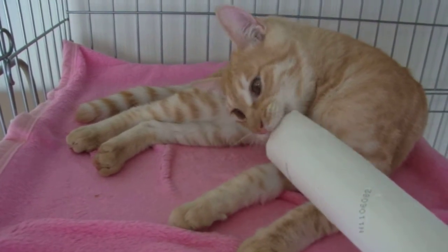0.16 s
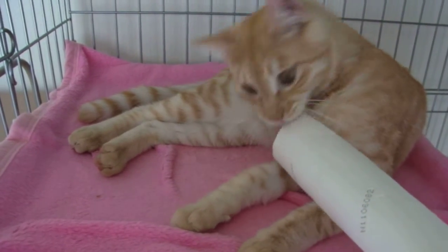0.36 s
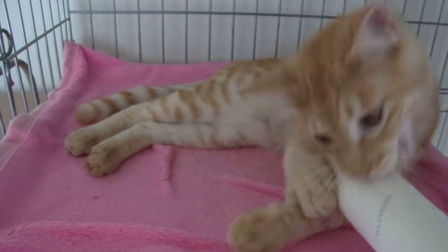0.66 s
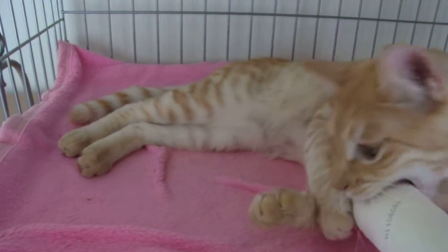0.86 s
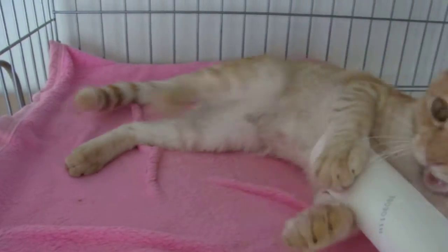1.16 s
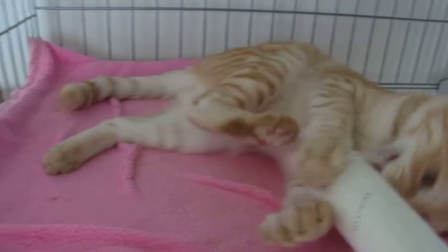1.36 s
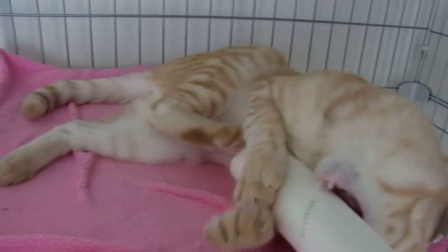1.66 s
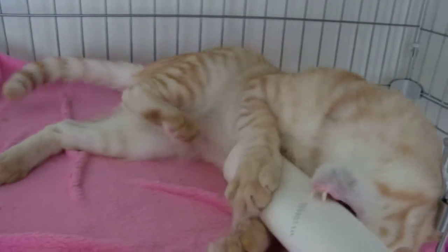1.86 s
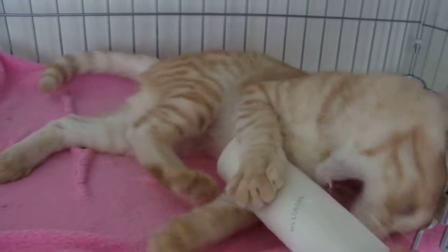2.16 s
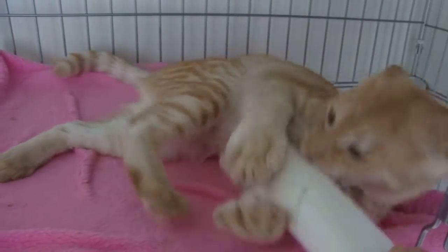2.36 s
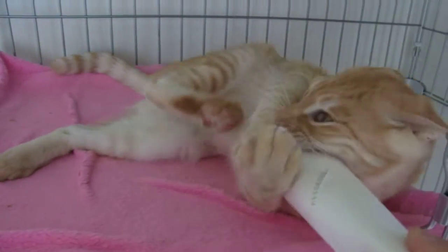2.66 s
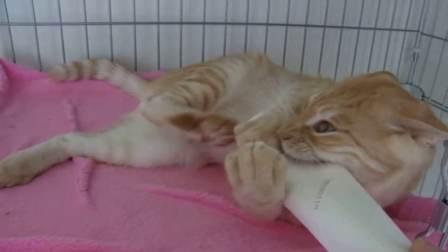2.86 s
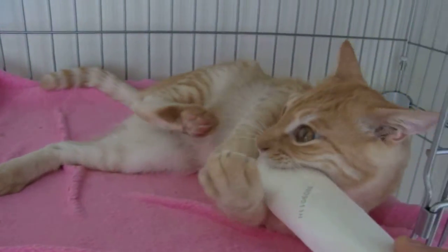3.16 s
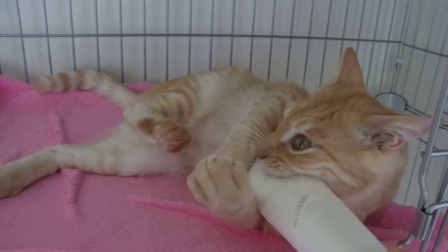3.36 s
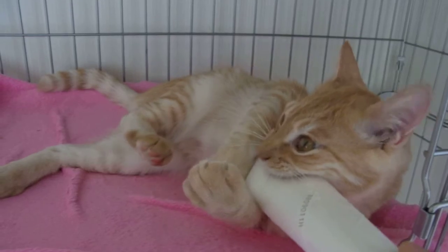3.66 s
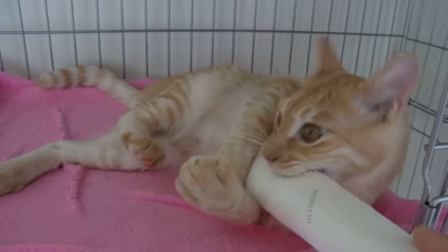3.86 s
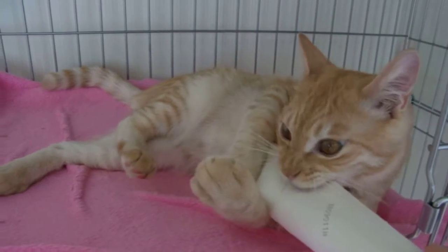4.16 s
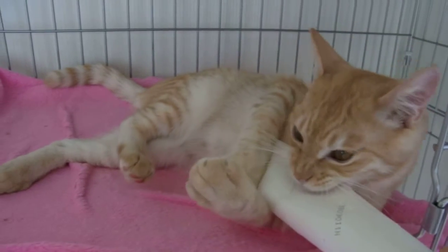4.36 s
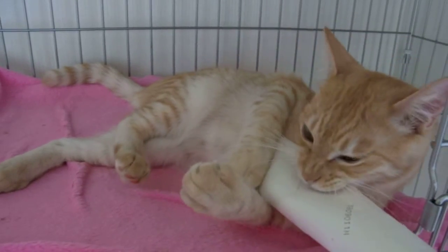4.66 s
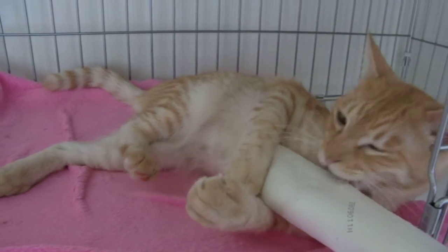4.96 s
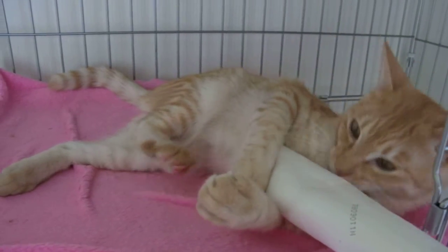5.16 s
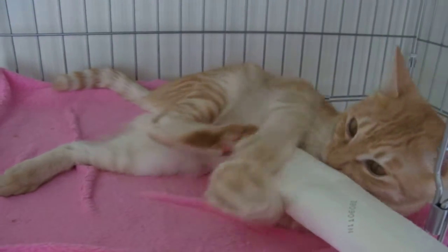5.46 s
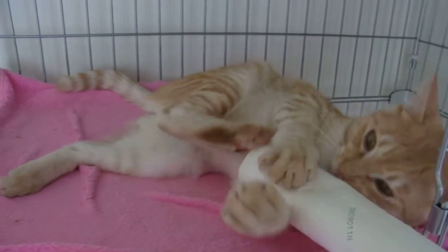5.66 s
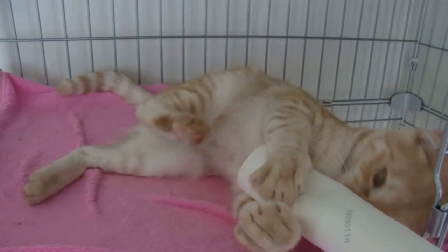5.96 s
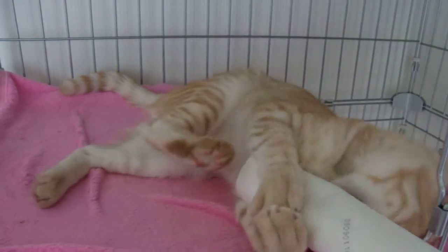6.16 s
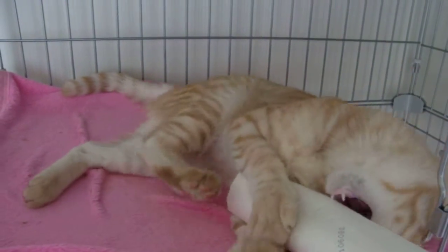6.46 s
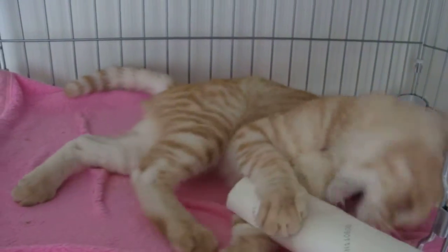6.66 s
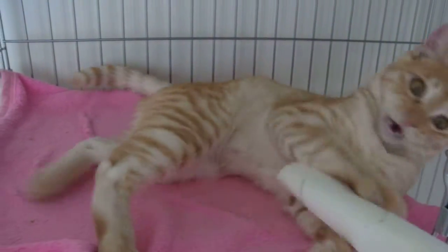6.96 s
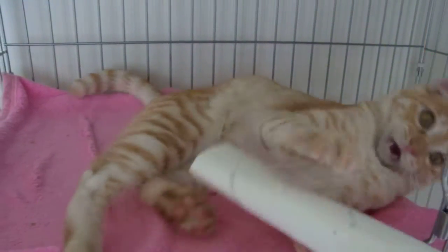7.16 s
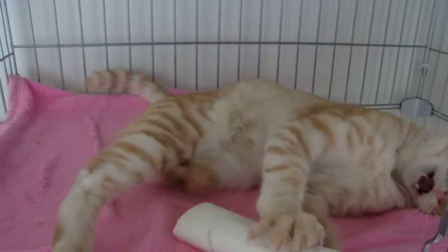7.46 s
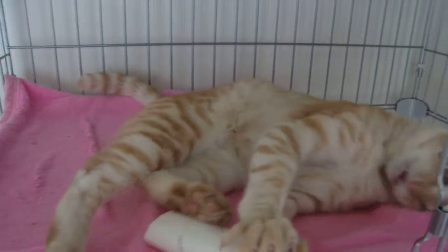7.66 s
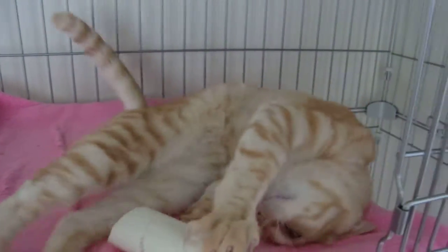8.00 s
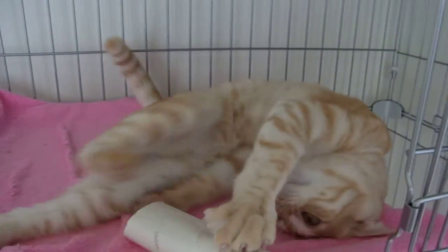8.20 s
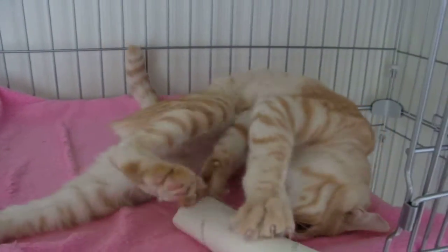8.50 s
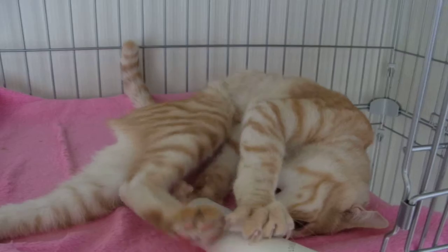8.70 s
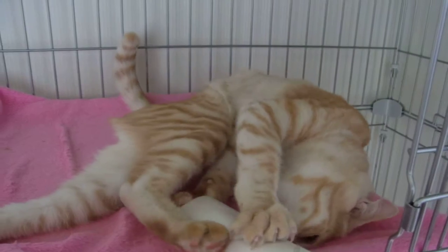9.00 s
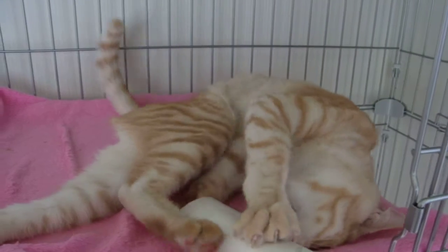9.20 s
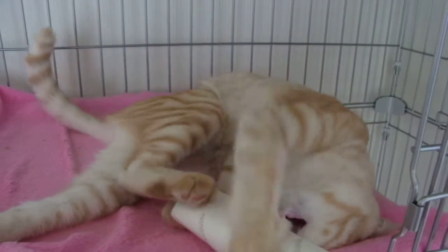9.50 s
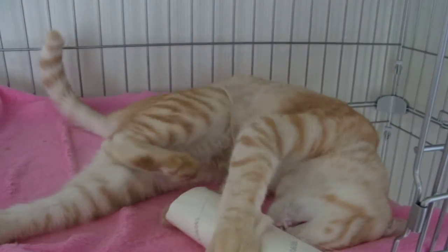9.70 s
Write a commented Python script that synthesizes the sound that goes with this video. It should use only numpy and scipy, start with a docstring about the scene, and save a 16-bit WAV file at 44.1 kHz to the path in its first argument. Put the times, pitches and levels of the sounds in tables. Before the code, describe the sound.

Claws scratch and knock a hollow cardboard tube, teeth creak and crackle on its rim, and soft thuds land on a blanket.

```python
"""In a cage in a small quiet room, a kitten wrestles a cardboard tube on a blanket, heard close by.
Fur and paws rub the tube and claws scrape it: friction noise drives its resonances.
Claws and teeth knock it and teeth creak through the rim in stick-slip jerks: pulses make it ring.
Damped modes colour these contacts; bumps thud, and low noise rumbles as the camera is handled.
Shaped noise gives the room air, and steady sines a mains hum and a thin electronic whine."""
import sys
import numpy as np
from scipy import signal
from scipy.fft import rfft, irfft
from scipy.io import wavfile
from scipy.ndimage import uniform_filter1d

SR = 44100
rng = np.random.default_rng(int(sys.argv[2]) if len(sys.argv) > 2 else 0)


def bounce(signal):
    """Save signal as a 16-bit WAV file at the path given by the first command-line argument."""
    frames = np.transpose(np.atleast_2d(signal))
    limited = np.clip(frames, -1, 1)
    pcm = np.round(limited * 32767).astype(np.int16)
    wavfile.write(sys.argv[1], SR, pcm)


N = 433944
TIME = np.arange(N) / SR
RING = 4096  # samples that a blow rings for
ATTACK = 220  # samples over which a blow's level is set
AGE = TIME[:RING]
TOP_HZ = 15800

# In the contact tables hollow_db and hiss_db are relative to the wall's level_db.
# Where marked "before trim", a small gain in the source or the mix follows.

# room air spectrum, of which only the shape counts: pitch_hz, density_db (per Hz)
AIR_SPECTRUM = [(25, -8), (70, -10.5), (350, -7.5), (900, -13.5), (5900, -21), (16000, -20.5)]
AIR_DB = -55.5
# mains hum and a thin electronic whine: pitch_hz, level_db (rms)
HUM_TONES = [(100.1, -61), (15519, -92)]

# damped resonances of each part: pitch_hz, width_hz, level_db (relative, before filtering)
# air inside the tube
HOLLOW_MODES = [(221, 17, -3.5), (388, 120, -1), (663.6, 49, 5.5), (686, 300, 0.5), (858, 14, 5)]
# cardboard wall
WALL_MODES = [(1275, 310, -5.5), (1463, 160, 5.5), (1690, 120, -1), (1865, 260, 4.5), (2450, 310, -0.5),
              (2750, 1200, -4), (3080, 550, 1), (3960, 460, -4.5), (4550, 740, -6)]
# sharp contact of claw and paper fibres
FIBRE_MODES = [(7400, 2900, -10.5), (11340, 4300, 10), (13650, 2100, -16)]
# rim clamped in the jaw
RIM_MODES = [(850, 180, 4.5), (1394, 140, 8), (2700, 1700, -10), (5140, 1800, -12.5), (10400, 1600, -12),
             (12800, 1500, -2.5)]

# strokes of fur and paws, before trim: firmest_s, swell_s, fade_s, level_db, hollow_db, hiss_db
RUB_STROKES = [(.65, 0.091, 0.055, -56.5, -8, 4.5), (.725, 0.012, 0.047, -50.5, 5.5, 1.5),
               (.81, 0.043, 0.058, -53.5, 6, 5), (.94, 0.019, 0.017, -54.5, 7, 1),
               (1.095, 0.056, 0.04, -45, 4.5, 2), (1.405, 0.012, 0.017, -50.5, -15, 9.5),
               (1.51, 0.085, 0.073, -51.5, -13, 7.5), (1.63, 0.018, 0.074, -49.5, 0.5, 0.5),
               (1.785, 0.077, 0.027, -46.5, -22, -0.5), (2.16, 0.35, 0.08, -57.5, 1.5, 1.5),
               (2.33, 0.094, 0.042, -56.5, -5, 3.5), (2.42, 0.038, 0.076, -52.5, -6, 7),
               (2.51, 0.041, 0.09, -54, 3.5, -8), (2.92, .015, 0.078, -51.5, -22, -3),
               (3.19, 0.022, 0.04, -55, 3.5, -8), (3.9, 0.061, 0.045, -51.5, 6.5, -6),
               (4.36, 0.3, 0.11, -60.5, 0, -21), (4.58, 0.055, 0.078, -56, -14, 3.5),
               (5.5, 0.022, 0.03, -54, -18, 2), (5.58, 0.014, 0.041, -54.5, -2, -1),
               (5.765, 0.047, 0.012, -50.5, -8.5, -0.5), (6.02, 0.2, 0.32, -54, -14, -3.5),
               (6.22, 0.082, 0.14, -60.5, 4.5, 4.5), (6.595, 0.13, 0.049, -57, 6, -1),
               (6.661, 0.043, 0.017, -48.5, 4, 1.5), (6.88, 0.065, 0.034, -53.5, -3.5, 2.5),
               (7.058, 0.077, 0.045, -43, -5.5, 3), (7.135, 0.035, 0.02, -37, -18, -10),
               (7.275, 0.063, 0.06, -43, -6.5, -2), (7.432, 0.022, 0.019, -39.5, -4, 1.5),
               (7.71, 0.26, 0.036, -57, -19, -5), (7.82, 0.14, 0.04, -51.5, -11, 8.5),
               (7.95, 0.083, 0.046, -52, -3, -3.5), (8.2, 0.15, 0.052, -54.5, -2, -8),
               (8.36, 0.059, 0.018, -55, 7, 3), (8.461, 0.042, 0.034, -42.5, 0, -1.5),
               (8.81, 0.11, 0.094, -57.5, -7, 4), (9.07, 0.051, .03, -55.5, -19, 2.5),
               (9.295, 0.036, 0.044, -43.5, -5.5, 0), (9.36, 0.021, 0.018, -48, 1, 1.5),
               (9.52, 0.011, 0.035, -47.5, 5.5, -7), (9.615, 0.045, 0.048, -46.5, 0, 2),
               (9.84, 0.016, .02, -50.5, -2, 0)]
PRESS_SHAPE = 1.16  # exponent of swell and fade: 1 is pointed, 2 a rounded bell
# light, unbroken touch of fur between strokes, before trim: wall_db, hollow_db, hiss_db (all absolute)
FUR_TOUCH = (-70, -73.5, -65)
# short claw strokes, before trim: start_s, length_s, level_db, hollow_db, hiss_db, spot_hz (touched spot)
CLAW_SCRAPES = [(0.12, 0.044, -50, -5.5, 1.5, 1550), (0.761, 0.049, -47.5, 6, -2, 3230),
                (1.09, 0.022, -37.5, -12, -13, 1335), (2.131, 0.034, -43.5, 0, -5, 1410),
                (2.474, 0.083, -49.5, -5, -21, 1320), (2.495, 0.016, -61, -14, -14, 2660),
                (2.902, 0.012, -36, -27, -11, 1790), (3.851, 0.034, -42, -3, -6.5, 1640),
                (4.433, 0.0082, -47.5, -24, -4, 1340), (7.078, 0.031, -40, -9, 0, 3360),
                (7.121, 0.027, -38.5, -15, -6.5, 880), (7.49, 0.018, -44, -15, 1.5, 3020),
                (7.922, 0.011, -49.5, -26, 4.5, 1750), (8.043, 0.019, -39.5, -19, -5.5, 1910),
                (8.155, 0.02, -37.5, -31, -9.5, 1780), (8.199, 0.0123, -39, -19, 3, 1730),
                (8.344, 0.025, -45, -14, -15, 3200), (8.72, 0.0073, -47.5, -17, 3.5, 1560),
                (8.77, 0.01, -44, -15, -2, 3100), (8.809, 0.018, -47, -20, -1, 3180),
                (8.848, 0.012, -50, -26, 3, 1890.0), (8.89, 0.012, -49.5, -8, -4, 1500),
                (9.187, 0.016, -44.5, -13, -3.5, 2000)]
# claws and teeth striking or snapping off the tube, before trim:
# start_s, level_db, hollow_db, hiss_db, spot_hz (touched spot)
TUBE_KNOCKS = [(0.124, -43, -17, 3, 1520), (0.3422, -47.5, -16, -13, 1860), (0.7105, -43.5, -2, -12, 1270),
               (1.435, -39.5, -7.5, -10, 1420), (1.5975, -41, -4, -3, 1450), (1.79, -39.5, -11, 2.5, 4080),
               (1.8019, -44, 10, -2, 1370), (2.4644, -36, -3, -10, 1270), (2.5966, -44.5, 7, -13, 1370),
               (2.6104, -46, 3, -3.5, 1330), (2.8, -47.5, -2.5, -7, 1513), (2.905, -32, -6.5, 2, 3150),
               (2.9677, -41.5, -12, -5, 3080), (3.1355, -42, -20, -6, 1460),
               (3.1665, -34.5, -6.5, 8.5, 4460), (3.1692, -31, -29, -13, 4240),
               (3.1752, -33.5, -13.5, 3.5, 955), (3.7551, -31.5, -16, 0.5, 1420),
               (3.766, -37, -7.5, -1, 1500), (3.861, -37.5, 3, -8, 1410), (3.8986, -34, -2.5, -5.5, 1320),
               (4.4919, -37.5, -16, -2.5, 1430), (4.5165, -45, -11, -5, 1700), (4.534, -42, -9, -4, 1380),
               (4.548, -44, -15, -9, 1900), (4.5882, -50.5, -5, 0, 1220), (4.7426, -32, -3.5, -8, 1360),
               (4.9272, -41.5, 2, -15, 1360), (4.9838, -43, 0, -16, 1570), (5.666, -45, -8, -14.2, 1740),
               (6.2096, -44.5, -5, -7, 3400), (6.9683, -37, -1, -8, 1460), (7.083, -36.5, -8, -6, 3500),
               (7.118, -33, -23, -11, 1660), (7.244, -26.5, -6.5, -14, 1630), (7.2489, -37, -8, -13, 1470),
               (7.26, -35, -6, -5, 1760), (7.2662, -26, -30, 2, 1730), (7.4406, -30.5, -31, -22, 1130),
               (7.442, -30.5, -26, 5.5, 2000), (7.4917, -44, -2, -9, 3100), (8.3087, -28.5, -10, 5, 3500),
               (8.793, -32, -29, -19, 1920), (9.1768, -36.5, -10.5, -10, 1670), (9.2945, -40, -5, -8, 1800),
               (9.494, -32, -1, -8, 1510), (9.5443, -21, -7, -11, 1620), (9.5482, -30, -3, 0, 3340),
               (9.614, -48, 2, -6, 1210)]
# body and tube bumping the padded floor: start_s, level_db, pitch_hz (thud)
FLOOR_BUMPS = [(.7105, -38.5, 342), (2.6118, -38, 370), (2.71, -51, 170), (2.765, -51, 380),
               (3.861, -39, 304), (9.495, -38, 330), (9.543, -34.5, 410), (9.614, -40, 352),
               (9.68, -47, 284)]
# faint deep rumbles as the camera is handled: peak_s, level_db
HANDLING_RUMBLES = [(1.3, -54.5), (1.76, -59), (2.13, -56), (7.46, -57), (9.48, -54)]
# path of one long claw swipe: time_s, pitch_hz (resonance), level_db
SWIPE_PATH = [(1.44, 3500, -46), (1.475, 3700, -56.5), (1.527, 2400, -43.5), (1.543, 2050, -53),
              (1.584, 2450, -50.5), (1.591, 1950, -33.5), (1.6, 1550, -47)]

# one long bite begins as a creak of quick, tiny slips that grow as the jaw closes (levels before trim)
CREAK_START_S, CREAK_END_S, CREAK_HZ = 3.334, 3.387, 255
CREAK_START_DB, CREAK_END_DB = -51, -38
# then the tooth holds and lets go in separate snaps: start_s
BITE_SNAPS = [3.4004, 3.408, 3.4261, 3.4338, 3.4494, 3.4688, 3.4798, 3.4926, 3.5132, 3.5341, 3.5399, 3.5826]
# a snap is louder the longer the tooth has held and the tighter the jaw has become (before trim)
SNAP_DB, SNAP_HOLD_S, SNAP_DB_PER_DOUBLING, JAW_DB_PER_S = -38.5, 0.016, 1.5, 26.5
# thin ticks of tooth on tooth: start_s, level_db
TEETH_TICKS = [(3.6645, -34)]
# spells of gnawing at the rim: start_s, end_s, rate_hz (ticks), level_db (each tick is set 10 to 18 dB lower)
GNAW_SPELLS = [(4.133, 4.207, 43, -41), (4.279, 4.4, 88, -39.5), (4.447, 4.64, 70, -40)]


def undb(db):
    """Logarithmic level: decibels become an amplitude gain."""
    return 10 ** (np.asarray(db) / 20)


def unit(x, size=None):
    """Normalisation: scale to rms 1, judged over the first size samples."""
    return x / np.sqrt(np.mean(x[:size] ** 2))


def add(out, s, x):
    """Superposition: mix x into out from time s on."""
    i = max(int(s * SR), 0)
    out[i:i + len(x)] += x[:max(len(out) - i, 0)]


def through(x, response):
    """Convolution: pass x through an impulse response."""
    return signal.fftconvolve(x, response)[:len(x)]


def cut(x, hz, kind, order=2):
    """Butterworth filtering: low-pass or high-pass."""
    return signal.sosfilt(signal.butter(order, hz, kind, fs=SR, output="sos"), x)


def ring(modes, low_hz):
    """Modal superposition: unit-energy damped resonances that radiate poorly under low_hz."""
    x = np.zeros(RING)
    for hz, width_hz, db in modes:
        decay = np.exp(-np.pi * width_hz * AGE)
        # scaling by width makes the level that of the resonance peak
        x += undb(db) * width_hz * decay * np.cos(2 * np.pi * hz * AGE)
    x = cut(x, low_hz, "high", order=3)
    x = cut(x, modes[-1][0] * 1.046, "low", order=3)
    return x / np.linalg.norm(x)


def wall_at(wall, spot_hz, spot_db, q):
    """Local modal excitation: at the touched spot one panel resonance of sharpness q stands out."""
    spot = np.exp(-np.pi * spot_hz / q * AGE) * np.cos(2 * np.pi * spot_hz * AGE)
    spot = cut(spot, spot_hz * 2, "low", order=1)
    both = wall + undb(spot_db) * spot / np.linalg.norm(spot)
    return both / np.linalg.norm(both)


def walk(rate):
    """Smoothed random process: a wander with rms 1, given rate new values a second."""
    k = int(SR / rate)
    steps = np.repeat(rng.standard_normal(N // k + 1), k)
    return unit(uniform_filter1d(steps, k)[:N])


def friction(rate, spread_db, jerk_db):
    """Stick-slip friction: fibres let go in rate uneven clicks a second, swayed by a jerky grip."""
    caught = rng.random(N) < rate / SR
    size_db = spread_db * np.minimum(rng.exponential(size=N), 4)
    clicks = caught * undb(size_db) * rng.choice([-1, 1], N)
    return unit(clicks * undb(jerk_db * walk(130)))


def press(late_s, swell_s, fade_s):
    """Pressure envelope: it builds up and eases off around the firmest moment, late_s = 0."""
    side_s = np.where(late_s < 0, swell_s, fade_s)
    return np.exp(-np.abs(late_s / side_s) ** PRESS_SHAPE)


def background(air_db):
    """Stationary noise and tones: spectrally shaped room air under a steady hum and whine."""
    hz, db = np.transpose(AIR_SPECTRUM)
    bins_hz = np.maximum(np.fft.rfftfreq(N, 1 / SR), 1)
    shape = undb(np.interp(np.log(bins_hz), np.log(hz), db))
    air = irfft(rfft(rng.standard_normal(N)) * shape, N)
    hum = sum(undb(db) * np.sqrt(2) * np.sin(2 * np.pi * hz * TIME) for hz, db in HUM_TONES)
    return unit(air) * undb(AIR_DB + air_db) + hum


def rubbing(tube, spot_hz=1700, roam=.25, roam_rate=20, width_hz=170, spot_db=-6, wall_db=-1):
    """Friction-driven resonance: fur and pads drag in strokes, and the panel under them rings as they roam."""
    grains = friction(rate=4500, spread_db=2.0, jerk_db=2.0)
    powers = [np.full(N, undb(db) ** 2) for db in FUR_TOUCH]
    for s, swell_s, fade_s, db, hollow_db, hiss_db in RUB_STROKES:
        start = max(s - 4 * swell_s, 0)
        stroke = press(np.arange(start - s, 4 * fade_s, 1 / SR), swell_s, fade_s)
        for power, part_db in zip(powers, (0, hollow_db, hiss_db)):
            add(power, start, (stroke * undb(db + part_db)) ** 2)
    wall, hollow, fibres = (through(grains * np.sqrt(power), part) for power, part in zip(powers, tube))
    # low-passed grains on a wandering carrier make the roaming resonance
    roaming_hz = spot_hz * np.exp(roam * walk(roam_rate))
    phase = 2 * np.pi * np.cumsum(roaming_hz) / SR
    spot = unit(cut(grains, width_hz, "low") * np.cos(phase)) * np.sqrt(powers[0])
    return undb(wall_db) * wall + undb(spot_db) * spot + hollow + fibres


def scraping(tube, rise_s=0.0043, release_s=0.0066):
    """Friction under a brief load: a claw digs in, rasps along the wall and lifts off."""
    wall, hollow, fibres = tube
    grains = friction(rate=2800, spread_db=2.0, jerk_db=0.5)
    out = np.zeros(N)
    for s, length_s, db, hollow_db, hiss_db, spot_hz in CLAW_SCRAPES:
        count, i = int(length_s * SR), int(s * SR)
        t = TIME[:count + RING]
        dig_in = 1 - np.exp(-t / rise_s)
        lift_off = np.exp(-np.maximum(t - length_s, 0) / release_s)
        stroke = grains[i:i + len(t)] * dig_in * lift_off
        touched = wall_at(wall, spot_hz, spot_db=1.0, q=9.7)
        for part, part_db in ((touched, 0), (hollow, hollow_db), (fibres, hiss_db)):
            add(out, s, unit(through(stroke, part), count) * undb(db + part_db))
    return out


def knocking(tube, crush=0.088, crush_s=0.0051, point_hz=420):
    """Impulsive excitation: a sharp release and a few milliseconds of crushing fibres ring the tube."""
    wall, hollow, fibres = tube
    hollow = cut(hollow, point_hz, "high")  # a point contact hardly stirs the deepest air modes
    out = np.zeros(N)
    for s, db, hollow_db, hiss_db, spot_hz in TUBE_KNOCKS:
        push = crush * rng.standard_normal(RING) * np.exp(-AGE / crush_s)
        push[0] = 1
        touched = wall_at(wall, spot_hz, spot_db=1.0, q=7.2)
        for part, part_db in ((touched, 0), (hollow, hollow_db), (fibres, hiss_db)):
            add(out, s, unit(through(push, part), ATTACK) * undb(db + part_db))
    return out


def disperse(x, lag, order=5):
    """Dispersion: bending waves in cardboard lag at low frequencies, so a click becomes a short chirp."""
    for _ in range(order):
        x = signal.lfilter([-lag, 1], [1, -lag], x)  # all-pass
    return x


def room(x, wet_db, low_t60=0.19, high_t60=0.12, high_db=-3, split_hz=2500, gap_s=0.0037):
    """Reverberation: reflections from the cage floor and near walls decay, the treble first (t60 in s)."""
    t = TIME[:SR // 2]
    noise = rng.standard_normal(len(t)) * (t > gap_s)
    low = cut(noise, split_hz, "low", order=1)
    high = undb(high_db) * (noise - low)
    tail = low * np.exp(-np.log(1000) * t / low_t60) + high * np.exp(-np.log(1000) * t / high_t60)
    return x + undb(wet_db) * through(x, tail / np.linalg.norm(tail))


def bumping(q=1.7):
    """Heavily damped resonance: soft weight lands on the blanket and the tray under it thuds."""
    out = np.zeros(N)
    for s, db, hz in FLOOR_BUMPS:
        thud = ring([(hz, hz / q, 0)], low_hz=90)
        add(out, s, unit(thud, ATTACK) * undb(db))
    return out


def handling(swell_s=0.065, fade_s=0.056, top_hz=45):
    """Band-limited noise under an envelope: faint deep rumbles swell and fade as the camera is handled."""
    low = cut(rng.standard_normal(N), top_hz, "low")
    rumble = unit(cut(low, 25, "high"))
    return rumble * sum(undb(db) * press(TIME - s, swell_s, fade_s) for s, db in HANDLING_RUMBLES)


def swiping(tube, width_hz=560, wall_db=-7):
    """Resonance glide: along a claw's path the panel in the main grows slacker and rings lower."""
    s, hz, db = np.transpose(SWIPE_PATH)
    grains = friction(rate=890, spread_db=-0.8, jerk_db=0.5)
    phase = 2 * np.pi * np.cumsum(np.interp(TIME, s, hz)) / SR
    glide = unit(cut(grains, width_hz, "low") * np.cos(phase))
    rasp = glide + undb(wall_db) * through(grains, tube[0])
    return rasp * undb(np.interp(TIME, s, db)) * (TIME > s[0]) * (TIME < s[-1])


def slips(uneven=.04):
    """Stick-slip loading: times and levels of a swelling creak, then snaps that release stored load."""
    creak = np.arange(CREAK_START_S, CREAK_END_S, 1 / CREAK_HZ)
    creak = creak + uneven * rng.standard_normal(len(creak)) / CREAK_HZ
    creak_db = np.interp(creak, (CREAK_START_S, CREAK_END_S), (CREAK_START_DB, CREAK_END_DB))
    snaps = np.array(BITE_SNAPS)
    held_s = np.maximum(np.diff(snaps, prepend=CREAK_END_S), 1 / CREAK_HZ)
    hold_db = SNAP_DB_PER_DOUBLING * np.log2(held_s / SNAP_HOLD_S)
    jaw_db = JAW_DB_PER_S * (snaps - CREAK_END_S)
    return [*zip(creak, creak_db), *zip(snaps, SNAP_DB + hold_db + jaw_db)]


def biting(tear=0.17, tear_s=0.0016, bite_db=1.0):
    """Stick-slip excitation: each slip of the tooth tears a few fibres and rings the damped rim."""
    rim = ring(RIM_MODES, low_hz=690)
    out = np.zeros(N)
    for s, db in slips():
        push = tear * cut(rng.standard_normal(RING), 2800, "high") * np.exp(-AGE / tear_s)
        push[0] += 1
        touched = wall_at(rim, rng.uniform(1370, 3000), spot_db=-13, q=14)
        add(out, s, unit(through(push, touched), ATTACK) * undb(db + bite_db))
    return out


def tooth_ticking():
    """Hard impact: tooth on tooth rings two short high modes."""
    modes = [(4770, 470, -10), (7400, 3300, -19)]  # pitch_hz, width_hz, level_db
    tooth = cut(ring(modes, low_hz=4400), 4400, "high", order=6)
    out = np.zeros(N)
    for s, db in TEETH_TICKS:
        add(out, s, unit(tooth, ATTACK) * undb(db))
    return out


def gnawing(tube, spread_db=4, hiss_db=-7, low_hz=1050, high_hz=2000):
    """Random impulses: small teeth snap single fibres at uneven moments, each at another spot."""
    wall, _, fibres = tube
    out = np.zeros(N)
    for start, end, rate, db in GNAW_SPELLS:
        draws = rng.random((int((end - start) * rate), 3))
        for k, (late, size, place) in enumerate(draws):
            spot_hz = low_hz * (high_hz / low_hz) ** (place ** 2)
            touched = wall_at(wall, spot_hz, spot_db=13, q=7.1)
            tick = unit(touched + undb(hiss_db) * fibres, ATTACK)
            tick_db = db + spread_db * (2 * size - 4.5)
            add(out, start + (k + late) / rate, tick * undb(tick_db))
    return out


def scene():
    """Source and resonator: most contacts sound through the tube's wall, hollow and surface fibres."""
    tube = ring(WALL_MODES, low_hz=825), ring(HOLLOW_MODES, low_hz=196), ring(FIBRE_MODES, low_hz=6000)
    sliding = undb(-0.5) * rubbing(tube) + undb(0.18) * scraping(tube) + swiping(tube)
    hits = undb(-0.38) * knocking(tube) + biting() + tooth_ticking() + gnawing(tube)
    mix = sliding + disperse(hits, lag=0.57) + bumping() + handling()
    return (room(mix, wet_db=-14.5) + background(air_db=0.0))[None]


def record(dry):
    """Band limiting: the recorder's steep elliptic low-pass cuts the highest treble."""
    return signal.sosfilt(signal.ellip(10, .2, 70, TOP_HZ, fs=SR, output="sos"), dry)


dry = scene()
out = record(dry)
bounce(out)
```